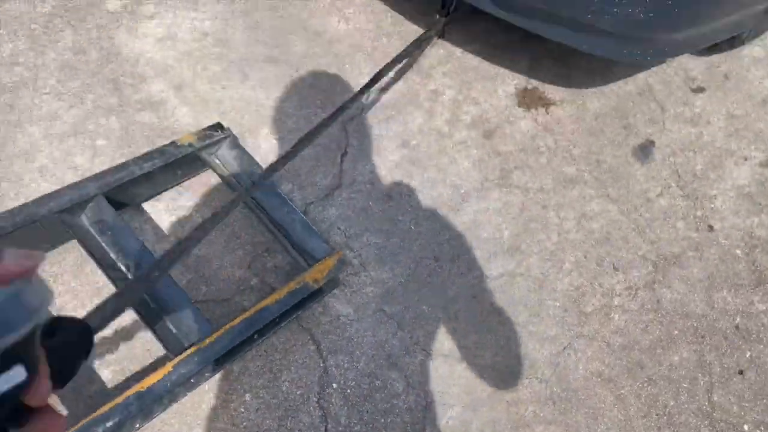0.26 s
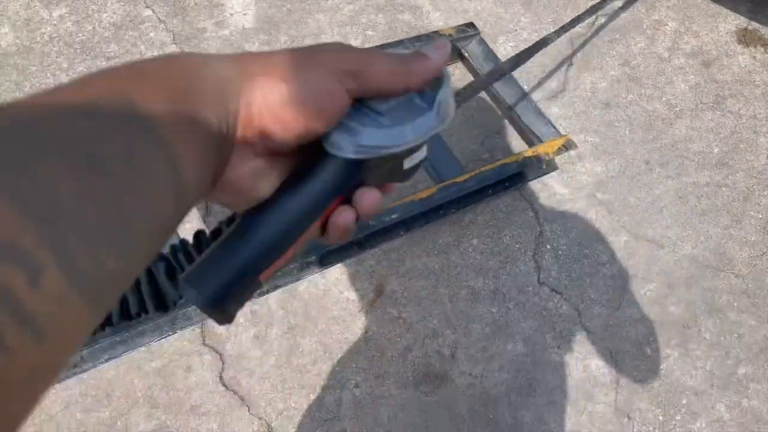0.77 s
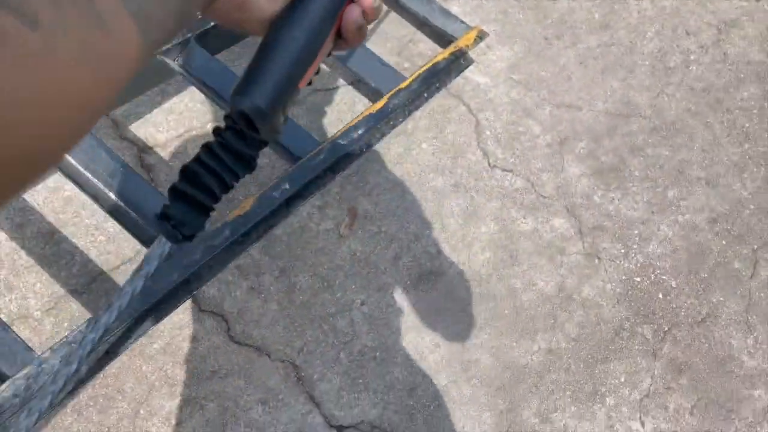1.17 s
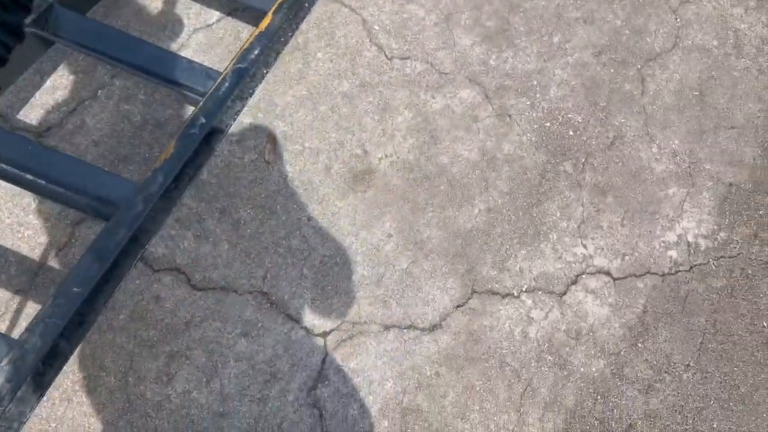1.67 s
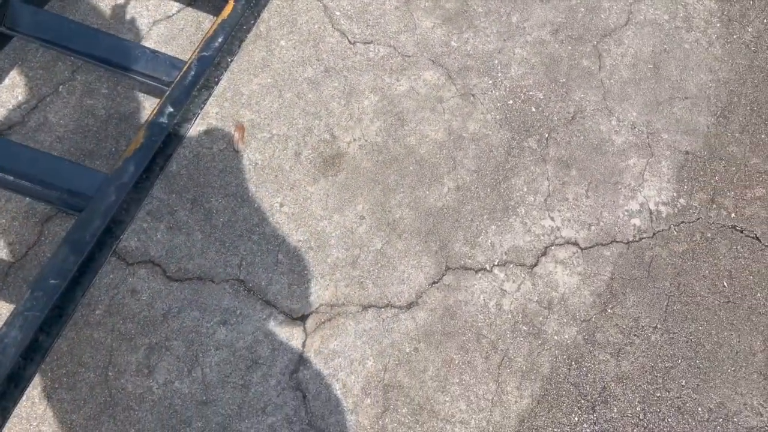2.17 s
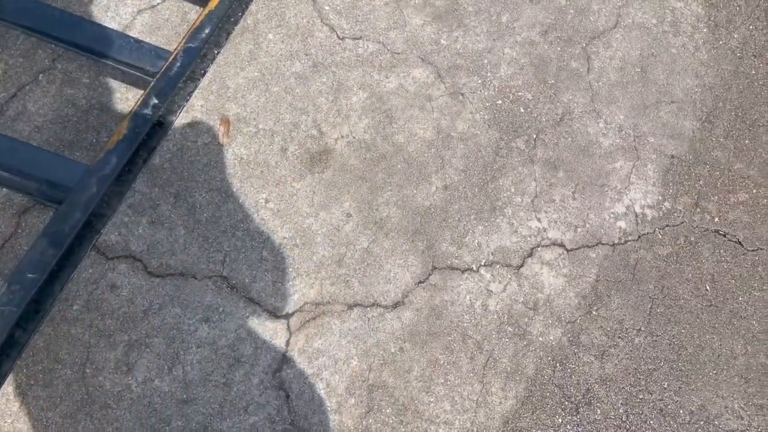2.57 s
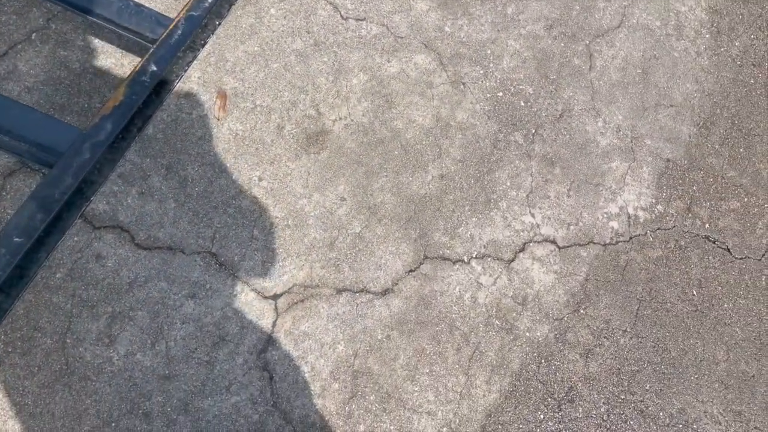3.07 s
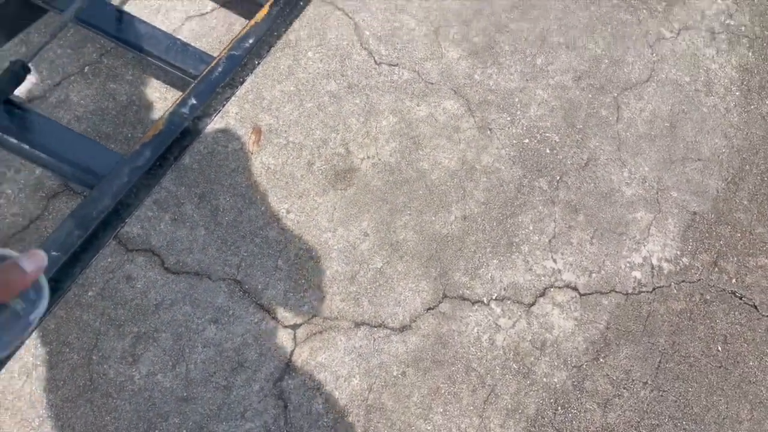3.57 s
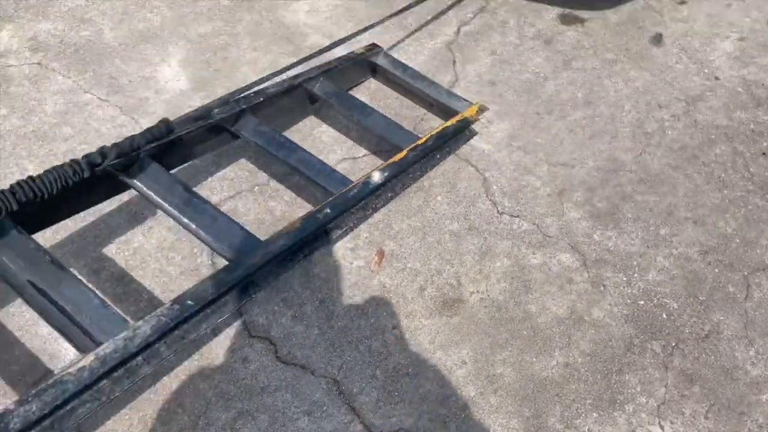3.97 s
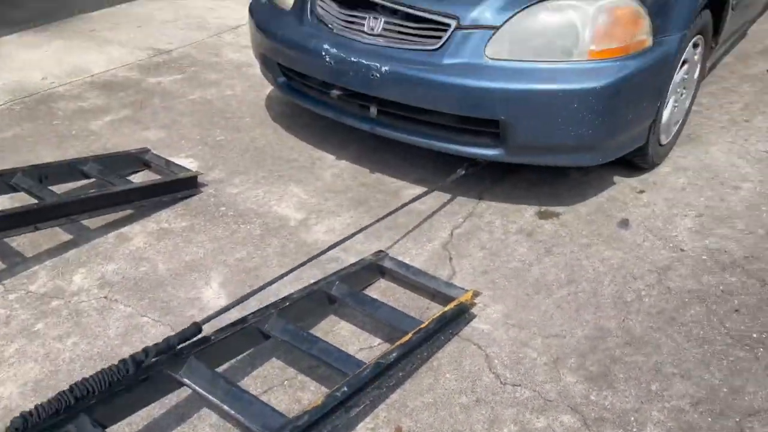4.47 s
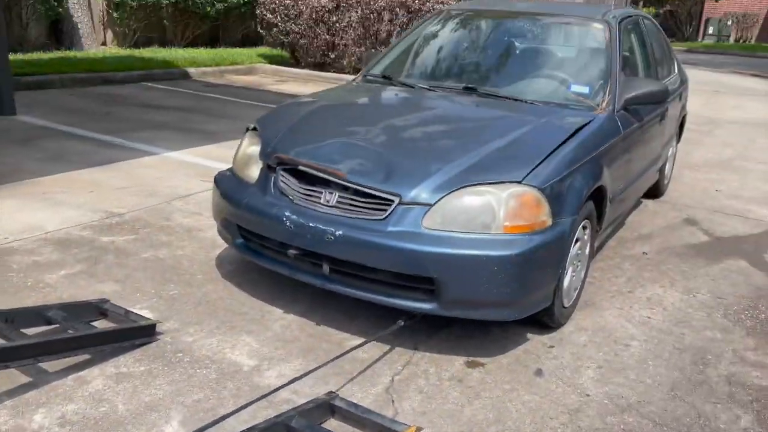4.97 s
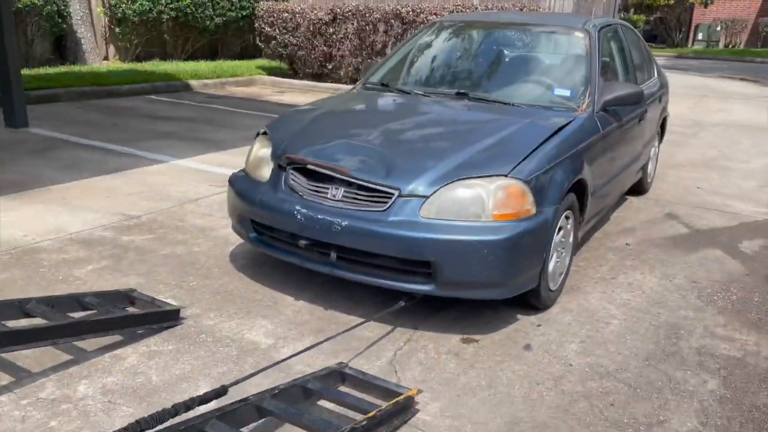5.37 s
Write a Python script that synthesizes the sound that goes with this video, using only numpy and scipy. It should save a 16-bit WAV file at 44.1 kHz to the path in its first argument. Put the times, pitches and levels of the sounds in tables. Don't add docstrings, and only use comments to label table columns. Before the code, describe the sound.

Outdoors, an electric winch takes the load with knocks and a gritty scrape, droning and groaning past a metal clank while a bird whistles.

```python
import sys
import numpy as np
from scipy import signal
from scipy.fft import rfft, irfft, next_fast_len
from scipy.io import wavfile

SR = 44100
rng = np.random.default_rng(int(sys.argv[2]) if len(sys.argv) > 2 else 0)


def output_pcm(signal):
    pcm = np.clip(np.atleast_2d(signal).T, -1, 1) * 32767
    wavfile.write(sys.argv[1], SR, np.round(pcm).astype(np.int16))


def amplitude_ratio(level_db):
    exponent = np.asarray(level_db, float) / 20
    return 10 ** exponent


N = 248283
TIME_S = np.arange(N) / SR


def rms_one(x):
    return x / np.sqrt(np.mean(x ** 2) + 1e-20)


def in_time(rows):
    return np.interp(TIME_S, *np.transpose(rows))


def at_hz(points, hz, axis=1):
    points = np.array(points, float)
    return np.interp(np.log(hz), np.log(points[:, 0]), points[:, axis])


def drift(rate_hz):
    r = np.exp(-80 * np.pi * rate_hz / SR)
    noise = rng.standard_normal(N // 40 + 2002)
    slow = signal.lfilter([1], [1, -2 * r, r * r], noise)[2000:]
    return np.interp(np.arange(N) / 40, np.arange(len(slow)), rms_one(slow))


def band(x, low_hz, high_hz):
    return signal.sosfilt(signal.butter(2, [low_hz, high_hz], "band", fs=SR, output="sos"), x)


def swells(rows, floor_db):
    power = amplitude_ratio(floor_db) ** 2
    for centre_s, length_s, db in rows:
        share = np.clip((TIME_S - centre_s) / length_s, -.5, .5)
        power = power + amplitude_ratio(db) ** 2 * np.cos(np.pi * share) ** 2
    return 10 * np.log10(power)


# frequency in Hz, likeness 0-1, right lag in radians.
PORTS = [(30, .93, 0), (250, .97, .2), (600, .5, 1.2), (1000, .7, 3.9), (1500, .4, 5.8), (2000, .7, 6.9),
         (3200, .3, 6.3), (4450, .6, 3.3), (5900, .94, 6.3), (7200, .8, 7.6), (8000, .88, 8.7),
         (8500, .95, 9.2), (9200, .98, 9.42), (9900, .95, 9.7), (10700, .8, 10.9), (11800, .85, 12.6)]
# frequency in Hz, left minus right in dB.
PORT_TILT = [(30, -0.8), (250, -2.5), (400, -1), (700, 3), (1400, 2.5), (2800, -0.1), (6000, 0)]


def ports(direct, other):
    size = next_fast_len(N)
    hz = np.maximum(np.arange(size // 2 + 1) * SR / size, 1)
    alike = np.clip(at_hz(PORTS, hz), 0, 1)
    tilt = amplitude_ratio(at_hz(PORT_TILT, hz) / 2)
    late = np.exp(-1j * np.interp(hz, *np.transpose(PORTS)[::2]))
    left = rfft(direct, size)
    right = alike * late * left + np.sqrt(1 - alike ** 2) * rfft(other, size)
    return irfft([left * tilt, right / tilt], size)[:, :N]


def walls(x, t60_s, per_s, wet_db):
    s = np.arange(int(.6 * SR)) / SR
    hits = rng.random((2, len(s))) < per_s / SR
    echoes = rng.standard_normal((2, len(s))) * hits * amplitude_ratio(-60 * s / t60_s)
    echoes *= amplitude_ratio(wet_db) / np.sqrt(np.sum(echoes ** 2, axis=1, keepdims=True))
    return signal.fftconvolve(x * np.ones((2, 1)), echoes, axes=1)[:, :N]


# time in seconds, level in dB.
LOAD = [(0, -46), (.3, -45.5), (.7, -42), (1.1, -41), (1.285, -39.5), (1.31, -31), (1.43, -34), (1.5, -30),
        (1.7, -35), (1.95, -30.5), (2.5, -31.5), (3.0, -31), (3.2, -32.5), (3.55, -29), (3.8, -34.5),
        (4.6, -36), (5.1, -39), (5.63, -42.5)]
# time in seconds, jump in dB.
SNATCHES = [
    (1.33, 5),
    (1.47, 2),
    (1.9, -1.5),
    (3.26, 3),
    (3.46, 2),
]


def pull():
    full_load_db = -31
    return in_time(LOAD) - full_load_db


def effort():
    rise_s, fall_s = 0.01, 0.017
    load = pull()
    for s, db in SNATCHES:
        load += db * np.exp(-np.abs(TIME_S - s) / np.where(TIME_S < s, rise_s, fall_s))
    return load


# frequency in Hz, density in dB per Hz.
RUMBLE = [(25, -37), (40, -5), (60, -3), (100, -2.5), (160, -5), (260, -8.5), (400, -30)]
DRONE = [(120, -8), (200, -5.5), (400, 1), (600, -4), (900, -7.5), (1300, -24.5), (1700, -16.5),
         (2400, -85)]
RASP = [(900, -9.5), (1500, -9.5), (2000, -10), (2500, 2), (3000, -8.5), (3600, -8), (4400, -5),
        (5500, -43)]
HISS = [(3000, -58), (4500, -34.5), (5500, 4.5), (7000, 4), (8500, 9.5), (10000, 10), (11200, -25),
        (12500, -27)]
# level at full load in dB, share of load swing, share of facing swing.
LAYERS = [
    (-38, 0.48, 0),
    (-31.5, 1.0, 0.11),
    (-44, 0.54, 0.56),
    (-45.5, 0.69, 1.0),
]
# time in seconds, gain of its bright parts in dB.
FACING = [(0, 13.5), (.3, 8), (.6, -2.5), (.9, 3), (1.2, 1.5), (1.6, 0), (2.8, 1.5), (3.4, 0.5),
          (3.8, -2.5), (4.6, -7), (5.1, -6), (5.63, -6.5)]
# centre in seconds, length in seconds, level in dB.
LURCHES = [
    (.33, 0.069, -49),
    (.82, 0.042, -35.5),
    (1.14, .15, -42),
    (2.15, 0.23, -37),
    (2.6, 0.13, -41),
    (3.5, 0.41, -38),
    (3.93, 0.22, -40.5),
    (4.12, 0.07, -29.5),
]


def winch_noise(patchy_db, shared_db):
    white = [ports(*rng.standard_normal((2, N))) for _ in range(2)]
    edges = 25 * 2 ** (np.arange(28) / 3)
    centres = np.sqrt(edges[1:] * edges[:-1])
    shapes = []
    for shape in (RUMBLE, DRONE, RASP, HISS):
        inside = (centres > shape[0][0]) & (centres < shape[-1][0])
        density = amplitude_ratio(at_hz(shape, centres)) ** 2 * inside
        shapes.append(density / np.sum(density * centres) * 2 * SR)
    shapes = np.array(shapes)
    load, facing = effort(), in_time(FACING)
    levels = [db + load_share * load + turn * facing for db, load_share, turn in LAYERS]
    levels[0] = swells(LURCHES, levels[0])
    powers = amplitude_ratio(np.array(levels)) ** 2
    together, out = drift(2.9), 0
    for k, hz in enumerate(centres):
        flicker = amplitude_ratio(patchy_db * drift(21) + shared_db * together * (hz > 1500))
        level = np.sqrt(shapes[:, k] @ powers)
        out = out + level * flicker * band(white[k % 2], edges[k], edges[k + 1])
    return out


def tone(hz, level_db, wobble_hz, wobble_rate_hz, flutter_db, lag_rad):
    phase = 2 * np.pi * np.cumsum(hz + wobble_hz * drift(wobble_rate_hz)) / SR
    level = np.sqrt(2) * amplitude_ratio(level_db + flutter_db * drift(27.0))
    return level * np.sin([phase, phase - lag_rad])


def glides(rows, wobble_hz, flutter_db, lag_rad):
    out = 0
    for start_s, length_s, first_hz, last_hz, db in rows:
        share = np.clip((TIME_S - start_s) / length_s, 0, 1)
        fade = np.clip(np.minimum(share, 1 - share) / 0.33, 0, 1)
        hz = first_hz + (last_hz - first_hz) * share
        out = out + fade * tone(hz, db, wobble_hz, 39.0, flutter_db, lag_rad)
    return out


# start in seconds, length in seconds, first Hz, last Hz, level in dB.
WHINES = [
    (2.3, 1.4, 1750, 1886, -52),
    (3.6, 2.5, 1792, 1930, -59.5),
]


def whine():
    throb = 1 + 0.79 * np.cos(2 * np.pi * np.cumsum(16 + 1.55 * drift(2.18)) / SR)
    return throb * amplitude_ratio(1.4 * drift(7.8)) * glides(WHINES, 8.1, 0.93, 1.0)


# start in seconds, length in seconds, first Hz, last Hz, level in dB.
GROANS = [
    (1.9, 0.675, 182.9, 169, -39),
    (2.0, 1.85, 371, 418, -41.5),
    (3.6, 0.74, 207, 200, -44.5),
    (4.0, 0.52, 402.4, 405, -46),
]


def groans():
    return glides(GROANS, 7.3, 3.7, 0.17)


# start in seconds, length in seconds, first Hz, last Hz, level in dB.
WHISTLE_TONES = [
    (1.62, 0.238, 2495, 2446, -51),
]


def whistle_tone():
    return glides(WHISTLE_TONES, 15, 1.5, 1.0)


# centre in seconds, length in seconds, level in dB.
WHISTLE_GUSTS = [
    (1.77, 0.25, -56),
    (2.3, 0.92, -58),
    (3.23, 0.31, -41.5),
]


def housing_whistle(width_hz):
    hz = 2485 + 23.0 * drift(1.2)
    level_db = swells(WHISTLE_GUSTS, -49 + 1.14 * pull())
    low_pass = signal.butter(2, width_hz / 2, fs=SR, output="sos")
    narrow = signal.sosfilt(low_pass, rng.standard_normal((3, N)))
    phase = 2 * np.pi * np.cumsum(hz) / SR
    left = narrow[0] * np.cos(phase) + narrow[1] * np.sin(phase)
    right = narrow[0] * np.cos(phase - .8) + narrow[1] * np.sin(phase - .8)
    right = right + 1.8 * narrow[2] * np.sin(phase)
    return amplitude_ratio(level_db) * rms_one(np.array([left, right]))


def ring(clicks, hz, t60_s):
    r, w = amplitude_ratio(-60 / (t60_s * SR)), 2 * np.pi * hz / SR
    return signal.lfilter([0, np.sin(w)], [1, -2 * r * np.cos(w), r * r], clicks + 1e-18)


# pitch in Hz, level in dB, t60 in seconds.
RAMP = [(845, -3, .45), (918, -7, .3), (961, -6, 1.8), (971, -2.5, 2.9), (1373, -15, .5), (1482, -9.5, .8),
        (1497, -8, .5), (1534, -13, .8), (1565, -8, .4), (1610, -12, .9), (1663, -10, .4), (1707, -10, .9),
        (2110, -10, .4), (2160, -4, .35), (2190, -9, .25), (2595, -14, .18), (2810, -15, .4),
        (2869, -9, .3)]
# time in seconds, level in dB.
CLANK = [
    (3.442, -25),
    (3.455, -18),
    (3.463, -26),
]


def ramp():
    out, first = np.zeros((2, N)), round(3.4 * SR)
    at = [round(s * SR) - first for s, db in CLANK]
    strike_db = np.array(CLANK)[:, 1]
    for hz, mode_db, t60_s in RAMP:
        clicks = np.zeros((2, N - first))
        luck_db = rng.normal(0, 1.5, (2, len(at)))
        clicks[:, at] = amplitude_ratio(strike_db + mode_db - 12.5 + luck_db)
        out[:, first:] += ring(clicks, hz, t60_s)
    return out


# time in seconds, peak in dB, pitch in Hz, t60 in seconds, width as share of pitch.
KNOCKS = [(1.124, -39, 1290, .03, .5), (1.291, -25.5, 1080, 0.071, 0.22), (1.371, -40, 3520, 0.033, .06),
          (1.372, -24.5, 2480, 0.054, .2), (1.832, -25.5, 1070, 0.09, 0.17),
          (1.921, -29, 3440, 0.033, 0.09), (1.922, -29.5, 2000, .03, .3), (3.240, -22, 1010, 0.064, 0.32),
          (3.265, -25.5, 680, 0.39, 0.23), (3.442, -29, 2170, .06, 0.069), (3.443, -20, 1250, 0.26, 0.81),
          (3.757, -26, 3140, 0.063, 0.077), (3.758, -32.5, 2543, .04, 0.053), (3.759, -30, 1540, 0.2, 0.19)]


def knocks():
    out, t = np.zeros((2, N)), np.arange(SR // 5) / SR
    for s, db, hz, t60_s, width in KNOCKS:
        noise = rng.standard_normal(len(t)) + .5 * rng.standard_normal((2, len(t)))
        puff = noise * amplitude_ratio(-60 * t / t60_s)
        puff[:, :3] += 5
        puff = band(puff, hz / (1 + width), hz * (1 + width))
        i = round(s * SR)
        out[:, i:i + len(t)] += amplitude_ratio(db) * puff / np.max(np.abs(puff))
    return out + walls(out, 0.18, 900, -7)


# time in seconds, peak in dB.
TICKS = [(0.0074, -44), (0.133, -28.5), (0.1514, -34), (0.2033, -31), (0.3594, -49), (0.4246, -35.5),
         (0.5037, -34), (0.838, -42), (1.067, -32), (1.1253, -51), (1.292, -28), (1.3287, -28),
         (1.3701, -24), (1.4, -28), (1.5145, -43), (1.726, -35), (1.8315, -38), (1.921, -22.5),
         (2.111, -30), (3.239, -34), (3.2649, -32), (3.44, -33.5), (3.7574, -47)]


def ticks():
    out, t = np.zeros((2, N)), np.arange(SR // 20) / SR
    t60_s = 0.014
    for s, db in TICKS:
        i = round(s * SR)
        out[:, i:i + len(t)] += amplitude_ratio(db + 0.5 - 60 * t / t60_s) * rng.standard_normal((2, len(t)))
    return band(out, 2800, 18000)


# start in seconds, length in seconds, level in dB, centre in Hz, width ratio.
SCUFFS = [
    (0.228, 0.11, -39, 6000, 2.3),
    (0, 0.18, -44.5, 2850, 1.07),
    (0.304, 0.2, -69, 2470, 1.1),
    (1.052, 0.48, -49.5, 2500, 1.13),
    (1.298, 0.21, -32.5, 650, 1.57),
    (1.32, 0.19, -40, 2660, 1.23),
    (1.33, 0.13, -45, 7000, 2.3),
    (1.452, 0.17, -46.5, 4100, 1.15),
    (3.247, .05, -45, 7000, 1.4),
    (3.437, 0.068, -41.5, 4990, 1.8),
]


def scuffs():
    out, t = np.zeros((2, N)), np.arange(SR // 3) / SR
    lumps = amplitude_ratio(3.5 * drift(60))
    for start_s, length_s, db, hz, wide in SCUFFS:
        i = round(start_s * SR)
        grains = rng.standard_normal((2, len(t))) * lumps[i:i + len(t)]
        swell = np.interp(t, [0, .01, 0.42 * length_s, 0.76 * length_s], [0.21, 0.91, 0.8, 0.063])
        out[:, i:i + len(t)] += amplitude_ratio(db) * swell * rms_one(band(grains, hz / wide, hz * wide))
    return out


def grit():
    return ports(*(ticks() + scuffs()))


def sides(pan_db):
    return amplitude_ratio(np.array([[.5], [-.5]]) * pan_db)


def chip_tip(db, pan_db):
    length_s, start_hz, fall_hz_per_s = .012, 4750, 38000
    t = np.arange(int(length_s * SR)) / SR
    sweep = np.sin(2 * np.pi * (start_hz - fall_hz_per_s * t / 2) * t)
    return amplitude_ratio(db - 13) * np.sin(np.pi * t / length_s) ** 2 * sweep * sides(pan_db)


# start in seconds, length in seconds, final pitch in Hz, level in dB, pan in dB.
SLURS = [
    (.125, 0.095, 3114, -34, -4),
    (.725, 0.224, 3256, -41, -1),
    (1.975, 0.11, 3120, -35, -1),
    (2.375, 0.11, 3150, -34, -4),
    (2.81, 0.11, 3160, -33, -2.5),
]
FALLS = [
    (3.288, 0.095, 3355, -35, 0),
]
CHIPS = [
    (3.783, .075, 3440, -36, -3),
    (4.28, 0.083, 3412, -33.5, 1.5),
    (4.73, 0.11, 3403, -30.5, -1.5),
    (5.229, 0.13, 3412, -32, -2),
]
RISES = [
    (5.613, 0.035, 4560, -40, -13),
]


def bird():
    dry = np.zeros((2, N))
    rasp = np.array([drift(137), drift(150), drift(22)])
    # rows, starting pitch over final -1, slide s, slide roundness, swell s, fade dB per s, buzz Hz, waver Hz
    kinds = [(SLURS, .23, .045, 1.776, 0.067, 74, 170, 62.4),
             (FALLS, .21, .04, 1, 0.028, 43, 120, 40),
             (CHIPS, .18, .03, 0.866, 0.004, 113, 99.7, 40),
             (RISES, -.36, .012, 1.55, .014, 1.5, 22, 40)]
    for rows, drop, slide_s, roundness, swell_s, fade_db_per_s, buzz_hz, waver_hz in kinds:
        for start_s, length_s, hz, db, pan_db in rows:
            i = round(start_s * SR)
            t = np.arange(min(int(length_s * SR), N - i)) / SR
            waver, shake, slip = rasp[:, i:i + len(t)]
            slide = 1 + drop * np.exp(-(t / slide_s) ** roundness)
            depth_hz = waver_hz + 58.8 * (length_s > .2)
            phase = 2 * np.pi * np.cumsum(hz * slide + depth_hz * waver) / SR
            pulse = 1 + .7 * np.cos(2 * np.pi * buzz_hz * t + 1.2 * slip)
            shape = np.interp(t, [0, .005, swell_s], [0, .35, 1])
            shape = shape * amplitude_ratio(-fade_db_per_s * np.maximum(t - swell_s, 0))
            shape = shape * np.clip((length_s - t) / 0.017, 0, 1)
            voice = np.sin(phase)
            if rows is CHIPS:
                voice = voice + shape * (amplitude_ratio(-27) * np.sin(2 * phase) + amplitude_ratio(-31) * np.sin(3 * phase))
                tip, lead = chip_tip(db, pan_db), i - int(.011 * SR)
                dry[:, lead:lead + tip.shape[1]] += tip
            dry[:, i:i + len(t)] += amplitude_ratio(db + 1 + 1.3 * shake) * shape * pulse * voice * sides(pan_db)
    lag, leaves = round(.022 * SR), round(3.1 * SR)
    dry[:, lag:leaves] += amplitude_ratio(-6.5) * dry[::-1, :leaves - lag].copy()
    return amplitude_ratio(-0.5) * dry + walls(dry, 0.091, 360, 0.5) + walls(dry, 0.58, 1500, -0.51)


# centre in seconds, length in seconds, level in dB.
HUM_SWELLS = [
    (.22, 0.46, -40),
    (.6, 0.85, -44.5),
    (1.2, 0.42, -38),
    (1.62, 0.34, -41),
    (2.01, 0.31, -33.5),
    (2.7, 0.84, -36.5),
    (3.12, .25, -46),
    (3.65, 0.92, -40),
    (4.1, 0.43, -40.5),
]


def hum():
    return tone(119.6, swells(HUM_SWELLS, -50.5) - 2.0, 0.9, 7.9, 1.1, .05)


# centre in seconds, length in seconds, level in dB.
BOOM_SWELLS = [
    (0, 0.11, -39),
    (.3, 0.27, -47),
    (1.4, .15, -48),
    (1.68, 0.23, -38.5),
    (2.07, 0.46, -38.5),
    (2.57, 0.62, -40),
    (3.03, 0.29, -45),
    (3.58, 1, -41.5),
    (4.15, 0.11, -46),
    (5.35, 0.43, -48),
]


def boom():
    return tone(72, swells(BOOM_SWELLS, -54), 2.53, 4.17, 0.6, .05)


# centre in seconds, length in seconds, level in dB.
GUSTS = [
    (0, 1.7, -51),
    (.9, 1.5, -68),
    (5.1, 0.69, -44.5),
]


def wind():
    lumps_db = 7.5 * np.array([drift(2.7), drift(5.3)])
    return amplitude_ratio(swells(GUSTS, -65) + lumps_db) * rms_one(band(rng.standard_normal((2, N)), 37, 122))


def scene():
    winch = winch_noise(patchy_db=1.76, shared_db=1.0) + whine() + groans() + whistle_tone()
    winch = winch + housing_whistle(width_hz=120)
    return winch + ramp() + knocks() + grit() + bird() + hum() + boom() + wind()


def band_limit(x):
    return signal.sosfilt(signal.butter(12, 12750, fs=SR, output="sos"), x)


def record(dry):
    low_cut = signal.butter(4, 37, "high", fs=SR, output="sos")
    top_cut = signal.butter(8, 11150, fs=SR, output="sos")
    mix = signal.sosfilt(np.vstack([low_cut, top_cut]), dry)
    return band_limit(mix)


dry = scene()
out = record(dry)
output_pcm(out)
```